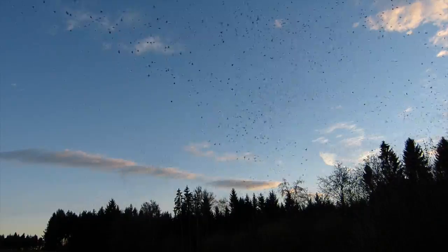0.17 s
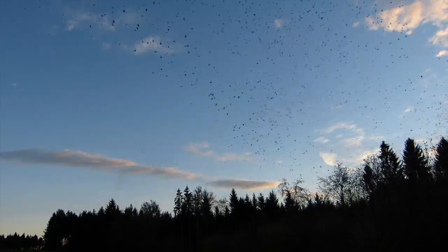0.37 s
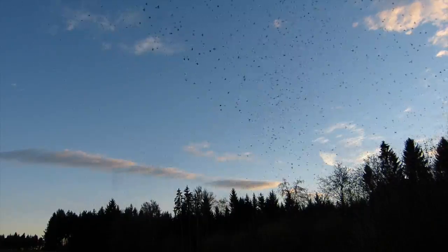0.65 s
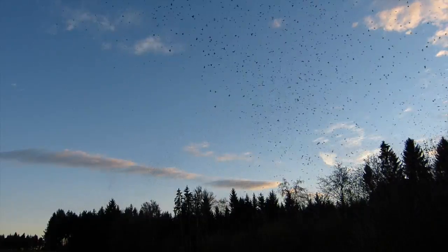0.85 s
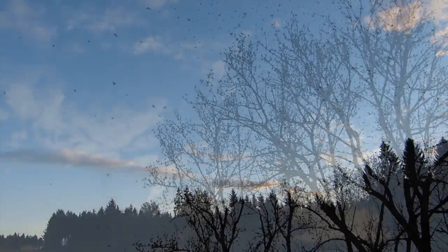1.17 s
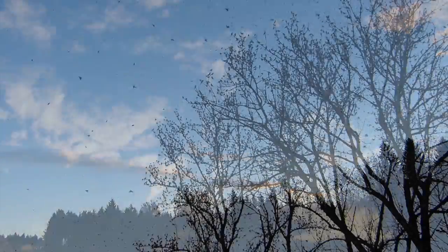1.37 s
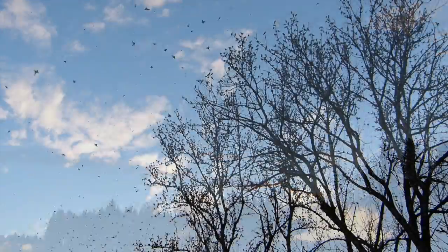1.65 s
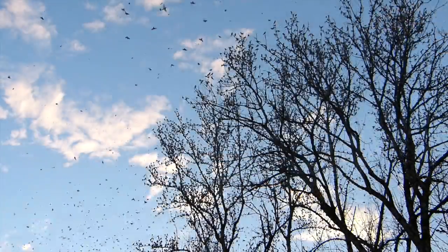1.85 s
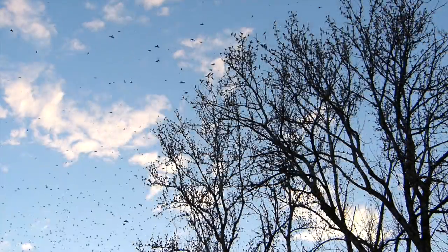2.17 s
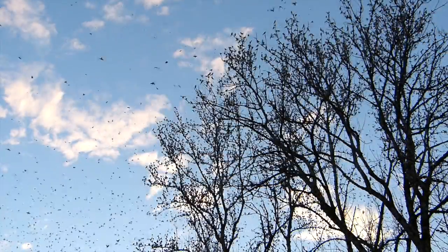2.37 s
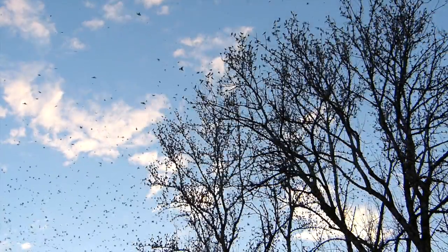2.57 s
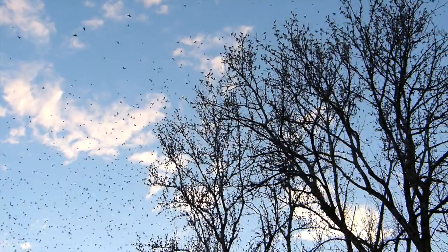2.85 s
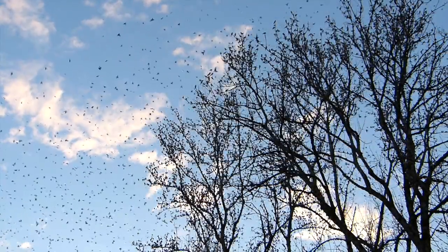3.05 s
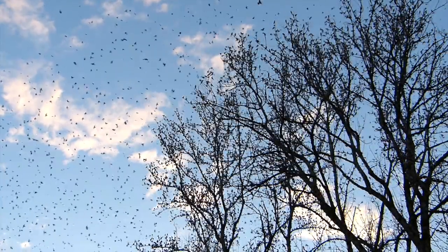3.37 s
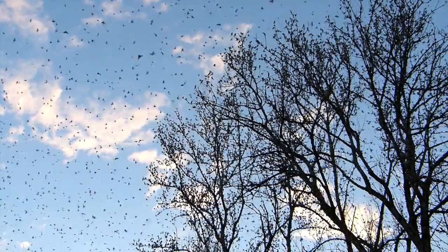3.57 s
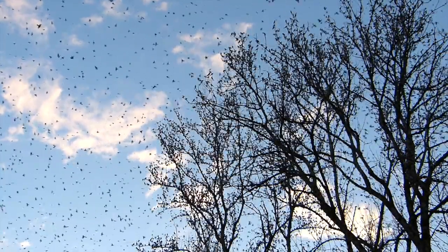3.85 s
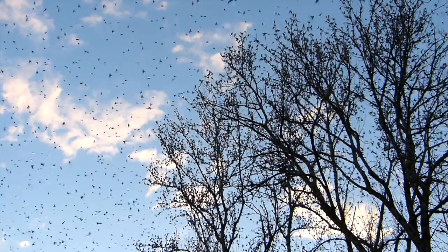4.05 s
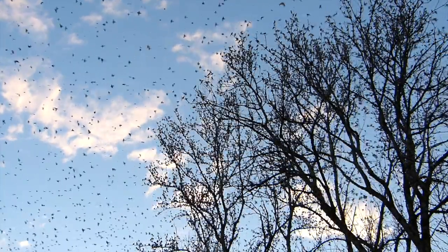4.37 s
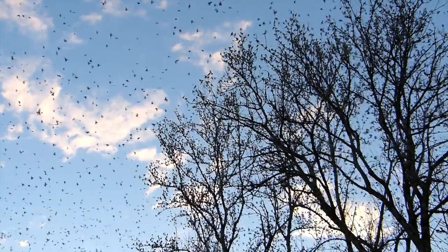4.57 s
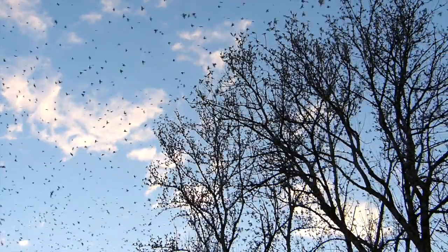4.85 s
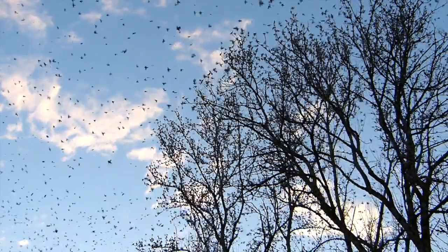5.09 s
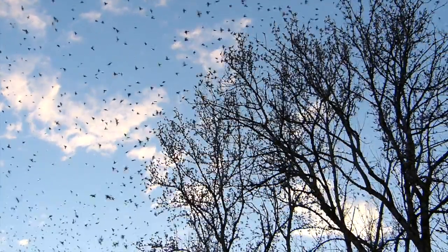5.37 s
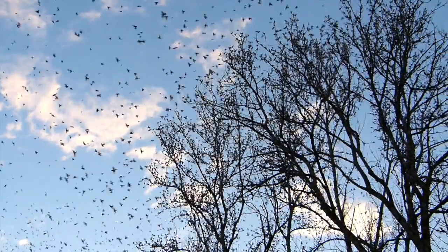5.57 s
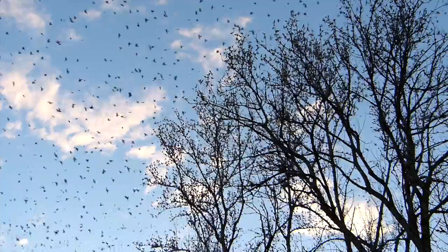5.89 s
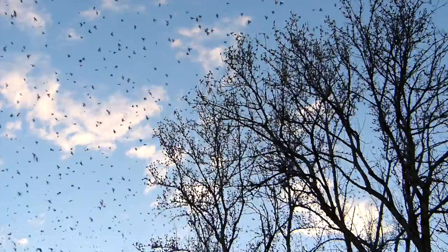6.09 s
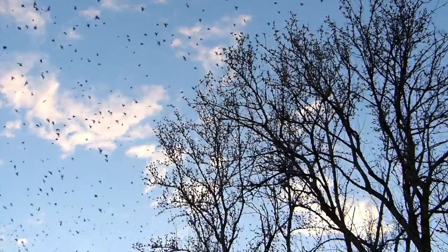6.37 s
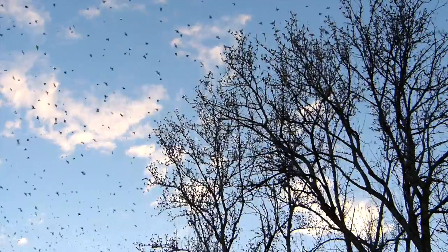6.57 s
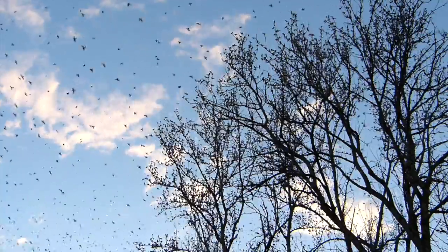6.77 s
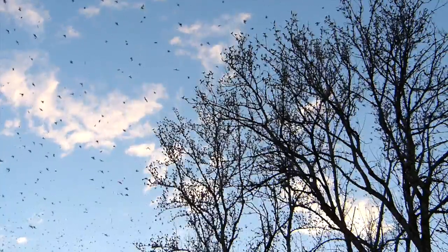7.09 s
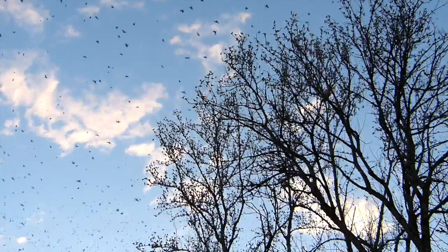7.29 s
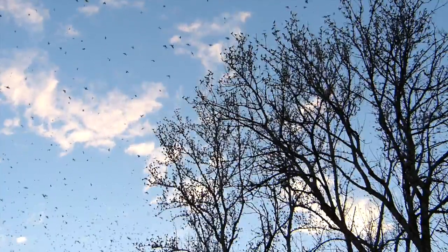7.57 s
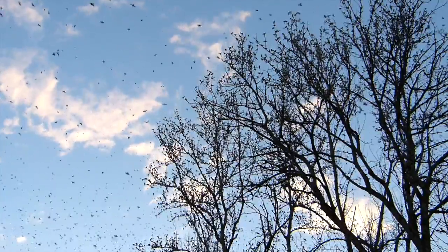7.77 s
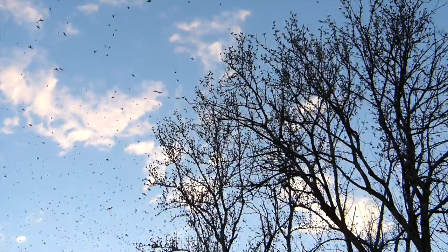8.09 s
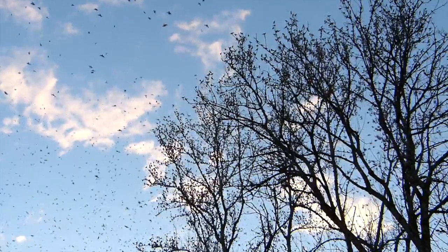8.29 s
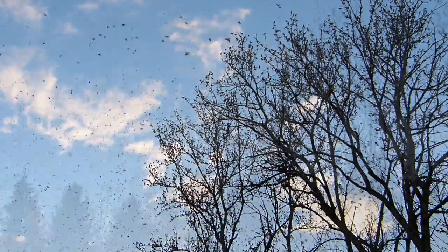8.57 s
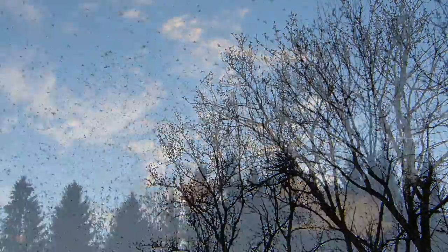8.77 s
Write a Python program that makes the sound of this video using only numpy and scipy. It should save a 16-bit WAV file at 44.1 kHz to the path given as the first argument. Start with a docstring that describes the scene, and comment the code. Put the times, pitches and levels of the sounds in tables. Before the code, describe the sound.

From the first instant, thousands of small finches call together outdoors, their quick chirps packed so tightly that they become a bright, seething hiss, strongest in the high mid treble. Until about 1.2 s the mass is loud, rather harsh and weighted to the right, with raspy lower notes and chatter. Around 1.5 s it blends into a slightly quieter, smoother, centred stream overhead. From 0.9 s thin, very short whistles of single nearby birds stand out irregularly, notably near 2.1, 2.8, 3.3, 3.9, 5.9, 6.6 and a lower, stronger one at 7.3 s, with a tiny diffuse tail from the trees. Soft puffing wing flutter and faint low rumble lie well underneath, fullest around 5 s, while the calls dip slightly between 5 and 5.5 s. The chorus then recovers and sizzles steadily, dipping briefly near 8.8 s, continuing to the end at about 9 s.

```python
"""Finches over a winter wood: at the start, a dense mass calls off to the right; thousands of chirps/s fuse to a hiss.
Harsh notes and chatter lie lower, over soft wing flutter (pulsed noise) and a low outdoor rumble (shaped noise).
From about 0.9 s thin calls, arched sine sweeps, stand out singly.
Around 1.5 s the mass gives way to a stream overhead; its thick passes at about 5 s, where wings and rumble peak.
"""
import sys
import numpy as np
from scipy import signal
from scipy.fft import rfft, irfft, next_fast_len
from scipy.io import wavfile
from scipy.ndimage import uniform_filter1d

SR = 44100
rng = np.random.default_rng(int(sys.argv[2]) if len(sys.argv) > 2 else 0)


def store_wav(level_fs):
    """Save 16-bit WAV to argv[1]."""
    pcm = np.round(np.clip(np.atleast_2d(level_fs), -1, 1) * 32767)
    wavfile.write(sys.argv[1], SR, pcm.T.astype(np.int16))


N = 393813

# Calling flock, loudness: t/s, level/dB
FLOCK_LEVEL = [(0.0, -24), (0.36, -24.5), (0.45, -26), (0.56, -24), (0.79, -25), (1.05, -24.5), (1.3, -27),
               (1.52, -29), (1.82, -28), (1.97, -26.5), (2.5, -27), (3.0, -27), (4.2, -26.5), (4.6, -27),
               (5.05, -29), (5.5, -29.4), (6.2, -27.7), (6.75, -27), (8.1, -26.5), (8.68, -27), (8.82, -29),
               (8.93, -27.5)]
# Brief, mostly slight swells of the chorus around one pitch: t/s, centre f/Hz, length at half height/s, rise/dB
BAND_SWELLS = [(0.195, 4500, .03, 0), (0.358, 4800, .03, 2.5), (0.628, 5200, .08, 0.5),
               (0.906, 4800, 0.073, 1.5), (1.03, 5000, 0.061, 1), (1.96, 4800, 0.041, 1.5),
               (3.32, 4800, 0.042, 1.5), (3.557, 3800, 0.044, 2), (3.72, 5100, .06, 3),
               (3.898, 4500, 0.041, 2.5), (4.16, 5400, 0.071, 1.5), (4.427, 4200, .05, 1),
               (4.636, 2200, 0.041, 2), (4.857, 2300, 0.061, 2.5), (5.893, 4800, .06, 1),
               (7.65, 4500, 0.065, 0.5), (8.31, 3600, .06, 2), (8.656, 4800, .06, 1.5)]
# Single birds close by: centre t/s, arch f/Hz, length/s, level/dB, slide from centre to end/share of f
NEAR_CALLS = [(0.89, 7500, .045, -34, -.1), (1.058, 7550, .04, -37, 0), (1.236, 7600, .035, -38, .03),
              (1.264, 7950, .04, -40, .03), (2.072, 6230, .03, -28.5, -.03), (2.451, 7600, .03, -37, 0),
              (2.492, 7680, 0.027, -39, -.04), (2.509, 6600, 0.044, -34, 0.0071),
              (2.848, 7370, .06, -34, -.09), (3.16, 8150, .04, -40, -.03), (3.264, 6600, .05, -33, .07),
              (3.913, 6230, .035, -33, .04), (3.989, 8150, .04, -41, -.05), (4.023, 7680, 0.043, -39, -.04),
              (4.059, 7180, .03, -40, -.04), (5.578, 8480, .04, -46, 0), (5.68, 7130, 0.032, -40, -0.037),
              (5.866, 5500, 0.034, -32, 0), (6.513, 8300, .03, -43, -.03), (6.603, 7350, .04, -34, -.03),
              (7.343, 4200, 0.026, -26, 0), (7.39, 7050, 0.054, -36, -0.09), (8.0, 7430, 0.035, -38, 0),
              (8.327, 7200, .03, -37, -.03), (8.69, 9320, .05, -45, .02)]
# Spectrum of the chirps: f/Hz, relative density/dB per Hz
CHIRP_COLOUR = [(2000, -31.5), (2700, -11.5), (3100, -7), (3700, -2), (4900, -1), (5600, -3.5),
                (6300, -6.5), (7000, -9), (8000, -16.5), (9000, -22), (10000, -27), (11200, -32.5),
                (12000, -45.5), (12700, -74)]
# Spectrum of the harsh calls: f/Hz, relative density/dB per Hz
HARSH_COLOUR = [(350, -22.5), (700, -18), (1000, -16), (1150, -9), (1320, -4), (1650, -5), (2000, 1),
                (2350, 1.5), (2750, 0), (3300, 3.5), (4500, -30)]
# Spectrum of the lower birds' chatter: f/Hz, relative density/dB per Hz
CHATTER_COLOUR = [(1000, -50), (1300, -17), (2000, -11), (2700, -7.5), (3000, -6.5), (4100, -1), (5000, 1),
                  (5700, -5.5), (6400, -12), (7000, -50)]
# Stereo width of the flock: f/Hz, side minus mid/dB
FLOCK_WIDTH = [(800, -1), (1300, -6.5), (2200, -7), (4000, -10.5), (6000, -12), (7500, -8), (9000, -2),
               (12000, -6.5)]
# Harsher, duller tone of the mass on the right: f/Hz, gain/dB
MASS_COLOUR = [(750, 1), (1050, -1), (1300, -1.5), (1600, 3), (2050, 0.5), (2300, 0), (2650, 1.5),
               (2880, 2), (3150, -0.5), (3850, -1), (4170, 0.8), (4500, -0.5), (4800, -1.5), (5300, 0),
               (6400, 0), (8500, 0.5), (11200, -3)]
# Spectrum of the wings: f/Hz, relative density/dB per Hz
WING_COLOUR = [(100, -17.5), (220, 1), (300, -0.5), (500, 0.5), (700, -3), (1000, -1), (1600, 2.5),
               (4000, -26.5)]
# Spectrum of the rumble: f/Hz, relative density/dB per Hz
RUMBLE_COLOUR = [(20, -5), (45, -42), (65, -13.5), (100, -2), (140, 1), (190, 1.5), (250, -8), (340, -29),
                 (700, -37)]
# Brief swells and dips of the low sounds: centre t/s, length/s, change/dB
LOW_SWELLS = [(1.39, 0.24, -4), (1.984, 0.27, 1), (2.5, .2, -1.5), (2.973, .15, 0.5), (4.12, 0.35, 1.5),
              (4.592, 0.12, 2), (5.377, .1, 1.8), (7.6, .4, -1.2)]
# Resonances and dips of the microphone housing: f/Hz, width/Hz, gain/dB
HOUSING = [(4055, 136, 2), (4410, 276, -3.5)]
# Capsule balance, the right one brighter: f/Hz, left minus right/dB
CAPSULE_BALANCE = [(700, -0.5), (1200, 0.8), (2200, 0), (6500, 0), (8500, -2), (11000, -2)]

# Levels within the chorus; harsh calls follow a share of its rise and fall
CHIRPS_DB, FAINT_DB, CHATTER_DB, HARSH_DB, HARSH_FOLLOW = -0.66, -10.5, -7, -10, 0.69
# Very slight random changes (standard deviation) of the whole chorus and of its bands
CHORUS_VARY_DB, CHORUS_VARY_HZ = -0.05, 24
BAND_VARY_DB, BAND_VARY_HZ = -0.13, 45
SWELL_OCTAVES = 0.45  # each way from the centre
# Mass to stream: middle and length of the crossfade; pans are left minus right
CHANGE_S, CHANGE_LENGTH_S, MASS_PAN_DB, STREAM_PAN_DB = 1.52, 0.57, -5, -0.2
# Thick of the stream: moment overhead, height, speed
OVERHEAD_S, HEIGHT_M, SPEED_M_S = 5.1, 31, 9.3
WINGS_DB, MASS_WINGS_DB = -49, -0.5  # straight above; change while the mass calls
RUMBLE_DB, RUMBLE_RISE_DB, RUMBLE_WAVER_DB = -58.5, 1.5, 1.8  # rise under the thick of the stream
LOW_PAN_DB = -1.1
TOP_HZ = 12100
OFFSET = -.0031  # converter, full scale 1, ahead of the top cut

TIME_S = np.arange(N) / SR
FREQS_HZ = np.fft.rfftfreq(N, 1 / SR)
FFT_SIZE = next_fast_len(N, True)
LEFT_RIGHT = np.array([[.5], [-.5]])


def undb(db):
    """Decibels to amplitude gain."""
    return 10 ** (np.asarray(db) / 20)


def gains(points):
    """(f/Hz, dB) points, joined over log frequency, as a gain per FFT bin."""
    hz, db = np.transpose(points)
    return undb(np.interp(np.log(FREQS_HZ + 1), np.log(hz), db))


def panned(pair, pan_db):
    """Level panning; pan_db is the added left minus right."""
    return pair * undb(pan_db * LEFT_RIGHT)


def random_levels(rate_hz):
    """Random levels held 1 / rate_hz, smoothed twice over that time; standard deviation 1."""
    hold = int(SR / rate_hz)
    steps = np.repeat(rng.standard_normal(N // hold + 1), hold)
    slow = uniform_filter1d(uniform_filter1d(steps, hold), hold)[:N]
    return slow / np.std(slow)


def spread(pair, colour, side_gain):
    """Two unrelated sounds, whitened and coloured, become mid and side; the mid has unit RMS."""
    spectra = rfft(pair)
    power = uniform_filter1d(np.abs(spectra) ** 2, size=900)
    spectra = spectra / np.sqrt(power + 1e-5 * power.mean()) * gains(colour)
    mid = irfft(spectra[0], N)
    side = irfft(spectra[1] * side_gain, N)
    return np.array([mid + side, mid - side]) / np.std(mid)


def chirp(hz, length_s, arch, slide, rasp=0., rasp_hz=298.0):
    """One syllable: pitch arches and slides; syrinx flutter modulates both level and pitch."""
    u = np.linspace(-1, 1, max(int(length_s * SR), 16))
    flutter = np.sin(np.pi * rasp_hz * length_s * u)
    pitch_hz = hz * (1 - arch * u ** 2 + slide * u) * (1 + 0.066 * rasp * flutter)
    envelope = np.cos(np.pi * u / 2) * (1 + rasp * flutter)
    return envelope * np.sin(2 * np.pi * np.cumsum(pitch_hz) / SR)


def crowd(sounds, scatter_db, count):
    """Each sound comes count times per channel, at random moments and levels, as if from scattered distances."""
    out = np.zeros((2, N + SR))
    for sound in sounds:
        starts = rng.integers(0, N, (count, 2))
        sizes = undb(scatter_db * np.minimum(rng.standard_normal((count, 2)), 2))
        for start, size in zip(starts, sizes):
            for side in range(2):
                out[side, start[side]:start[side] + len(sound)] += size[side] * sound
    out[:, :SR] += out[:, N:]  # already under way at the start
    return out[:, :N]


def far_crowd(pair, far_db):
    """Near birds plus far ones: so many and so scattered that their phases are random."""
    spectra = rfft(pair)
    phases = np.exp(2j * np.pi * rng.random(spectra.shape))
    return pair + undb(far_db) * irfft(spectra * phases, N)


def chirps():
    """Quick flight calls of many pitches, dense enough to fuse into a seething hiss."""
    birds = rng.random(size=(400, 4))
    pitches_hz = np.geomspace(2000, 12400, len(birds))
    calls = [chirp(hz, 0.00807 + .03 * long, 0.1516 * arch, 0.2994 * (rise - .5), rasp=0.45 * rasp)
             for hz, (long, arch, rise, rasp) in zip(pitches_hz, birds)]
    mass = far_crowd(crowd(calls, scatter_db=1.0, count=90), far_db=3.0)
    return spread(mass, CHIRP_COLOUR, gains(FLOCK_WIDTH))


def flicker(pair, flicker_db):
    """The treble flickers in overlapping bands, partly together, more the higher it goes."""
    spectra, shared = rfft(pair), random_levels(11)
    for hz in (7000, 8500, 10000, 11500):
        band = irfft(spectra * np.maximum(1 - np.abs(FREQS_HZ - hz) / 1500, 0), N)
        change_db = flicker_db * (hz / 10000) ** 2 * (0.3 * shared + random_levels(22))
        pair = pair + band * (undb(change_db) - 1)
    return pair


def faint_calls():
    """Whistles from further up, half sunk in the hiss; the air takes more off the high ones."""
    birds = rng.random(size=(130, 3))
    calls = []
    for high, long, rise in birds:
        call = chirp(3800 + 5600 * high, 0.0177 + 0.0286 * long, 0.117, 0.195 * (rise - .5),
                     rasp=0.34, rasp_hz=116.0)
        calls.append(undb(-19 * high ** 2) * call)
    left, right = crowd(calls, scatter_db=6, count=1)
    return np.array([left + 0.65 * right, right + 0.84 * left])


def chatter():
    """Held and gliding notes of the lower birds, sparse enough to leave traces of their own pitch."""
    birds = rng.random(size=(500, 4))
    pitches_hz = np.linspace(1200, 6500, len(birds))
    calls = [chirp(hz, .025 + .04 * long, .07 * arch, .12 * (rise - .5), rasp=.4 * rasp, rasp_hz=170.)
             for hz, (long, arch, rise, rasp) in zip(pitches_hz, birds)]
    return spread(crowd(calls, scatter_db=2.5, count=7), CHATTER_COLOUR, gains(FLOCK_WIDTH))


def harsh_calls():
    """Lower notes with an upward slide and strong flutter, hence a rasp."""
    birds = rng.random(size=(180, 3))
    pitches_hz = np.linspace(600, 4500, len(birds))
    calls = [chirp(hz, 0.00976 + 0.02533 * long, 0.1494, 0.2492 * rise, rasp=0.84, rasp_hz=250 + 250 * fast)
             for hz, (long, rise, fast) in zip(pitches_hz, birds)]
    mass = far_crowd(crowd(calls, scatter_db=2.0, count=90), far_db=5)
    return spread(mass, HARSH_COLOUR, gains(FLOCK_WIDTH))


def vary_bands(pair):
    """Bands a third of an octave apart vary in level, very slightly and at random."""
    spectra = rfft(pair, FFT_SIZE)
    octaves = np.log2(np.fft.rfftfreq(FFT_SIZE, 1 / SR) + 1)
    for hz in np.geomspace(1400, 7000, 8):
        weight = np.maximum(1 - 3 * np.abs(octaves - np.log2(hz)), 0)
        band = irfft(spectra * weight, FFT_SIZE)[:, :N]
        pair = pair + band * (undb(BAND_VARY_DB * random_levels(BAND_VARY_HZ)) - 1)
    return pair


def swell_bands(pair):
    """Brief, mostly slight swells of the chorus around one pitch."""
    out = pair.copy()
    for t_s, hz, length_s, rise_db in BAND_SWELLS:
        part = slice(int((t_s - length_s) * SR), int((t_s + length_s) * SR))
        edges_hz = hz * 2 ** (SWELL_OCTAVES * np.array([-1, 1]))
        bandpass = signal.butter(1, edges_hz, "bandpass", fs=SR, output="sos")
        band = signal.sosfiltfilt(bandpass, pair[:, part])
        out[:, part] += (undb(rise_db) - 1) * np.hanning(band.shape[1]) * band
    return out


def chorus():
    """All flock calls under one loudness curve, with very slight random changes of level."""
    t_s, level_db = np.transpose(FLOCK_LEVEL)
    flock_db = np.interp(TIME_S, t_s, level_db)
    usual_db = np.median(flock_db)
    harsh_db = usual_db + HARSH_DB + HARSH_FOLLOW * (flock_db - usual_db)
    high = undb(CHIRPS_DB) * flicker(chirps(), flicker_db=1.5)
    high = high + undb(FAINT_DB) * faint_calls() + undb(CHATTER_DB) * chatter()
    voices = undb(flock_db) * high + undb(harsh_db) * harsh_calls()
    return undb(CHORUS_VARY_DB * random_levels(CHORUS_VARY_HZ)) * swell_bands(vary_bands(voices))


def placed(voices, overhead):
    """Crossfade from the coloured mass on the right to the stream overhead."""
    mass = irfft(rfft(voices) * gains(MASS_COLOUR), N)
    return (1 - overhead) * panned(mass, MASS_PAN_DB) + overhead * panned(voices, STREAM_PAN_DB)


def wings():
    """Bursts of wingbeats, each stroke a soft puff of air (pulsed noise)."""
    t_s = TIME_S[:SR // 3]
    bursts = []
    for beat_hz in rng.uniform(14.9, 26.1, size=80):
        strokes = np.sin(np.pi * beat_hz * t_s) ** 4
        bursts.append(rng.standard_normal(len(t_s)) * np.hanning(len(t_s)) * strokes)
    return spread(crowd(bursts, scatter_db=5.0, count=20), WING_COLOUR, undb(-2.5))


def rumble():
    """Low noise of the open country, its level wavering at random."""
    noise = spread(rng.standard_normal((2, N)), RUMBLE_COLOUR, undb(-10.0))
    return undb(RUMBLE_WAVER_DB * random_levels(6.8)) * noise


def wood(pair, t60_s, wet_db):
    """Trunks and twigs scatter a short diffuse tail, decaying noise, behind the close calls."""
    tail = rng.standard_normal((2, SR)) * np.exp(-np.log(1000) * TIME_S[:SR] / t60_s)
    tail /= np.sqrt(np.sum(tail ** 2, axis=1, keepdims=True))
    return pair + undb(wet_db) * signal.fftconvolve(pair, tail, axes=1)[:, :N]


def near_calls():
    """Thin arched whistles of single birds passing low, some rising, some falling, each at a random pan."""
    out = np.zeros((2, N + SR))
    places = rng.uniform(-1, 1, len(NEAR_CALLS))
    for (t_s, hz, length_s, level_db, slide), place in zip(NEAR_CALLS, places):
        call = chirp(hz, length_s, arch=.15, slide=slide, rasp=0.2, rasp_hz=109.0)
        start = int((t_s - length_s / 2) * SR)
        out[:, start:start + len(call)] += undb(level_db) * panned(call, 3 * place)
    return wood(out[:, :N], t60_s=.2, wet_db=-9)


def scene():
    """Calls over wings and rumble; wing amplitude goes as 1 / distance to the thick of the stream."""
    nearness = HEIGHT_M / np.hypot(HEIGHT_M, SPEED_M_S * (TIME_S - OVERHEAD_S))
    overhead = np.clip(.5 + (TIME_S - CHANGE_S) / CHANGE_LENGTH_S, 0, 1)
    wing_noise = undb(WINGS_DB + MASS_WINGS_DB * (1 - overhead)) * nearness * wings()
    low = wing_noise + undb(RUMBLE_DB + RUMBLE_RISE_DB * nearness ** 2) * rumble()
    swell_db = sum(db * np.exp(-(2 * (TIME_S - t_s) / length_s) ** 2) for t_s, length_s, db in LOW_SWELLS)
    return placed(chorus(), overhead) + near_calls() + panned(undb(swell_db) * low, LOW_PAN_DB)


def record(dry):
    """Housing and capsules colour the sound; the converter adds an offset; the top is cut."""
    housing_db = sum(db * np.exp(-2 * ((FREQS_HZ - hz) / width_hz) ** 2) for hz, width_hz, db in HOUSING)
    capsules = gains(CAPSULE_BALANCE) ** LEFT_RIGHT
    coloured = irfft(rfft(dry) * undb(housing_db) * capsules, N) + OFFSET
    top_cut = signal.ellip(8, .2, 70, TOP_HZ, fs=SR, output="sos")
    return signal.sosfilt(top_cut, coloured)


dry = scene()
out = record(dry)
store_wav(out)
```